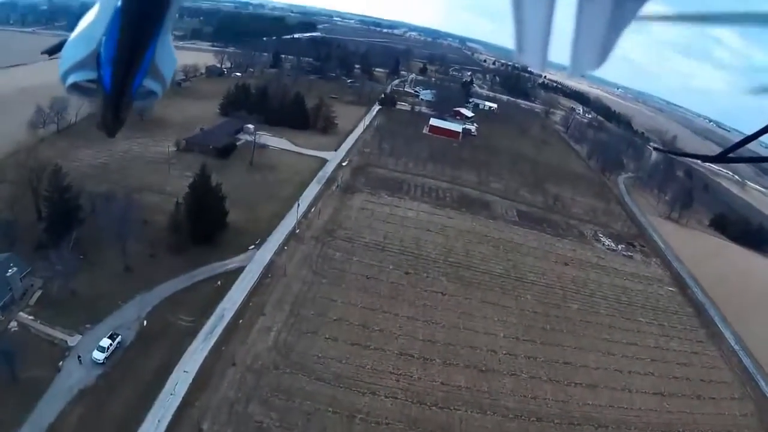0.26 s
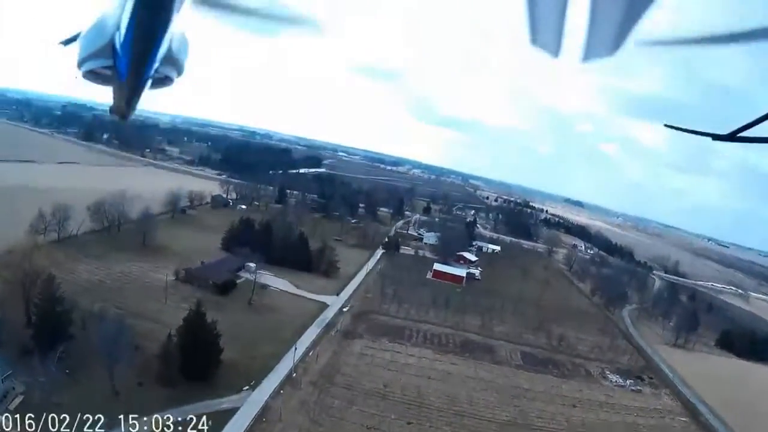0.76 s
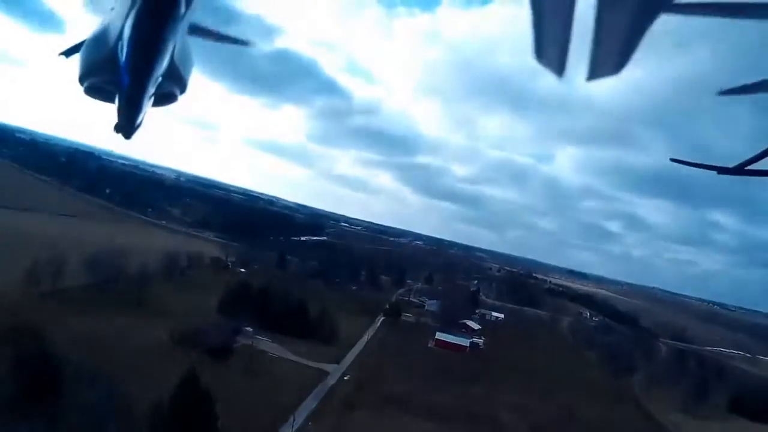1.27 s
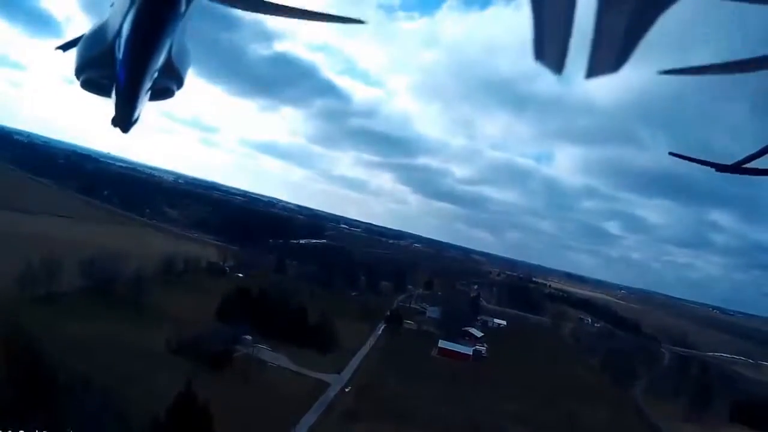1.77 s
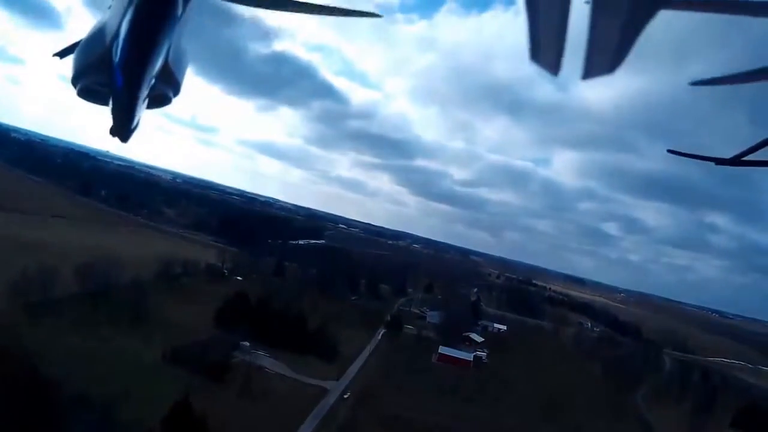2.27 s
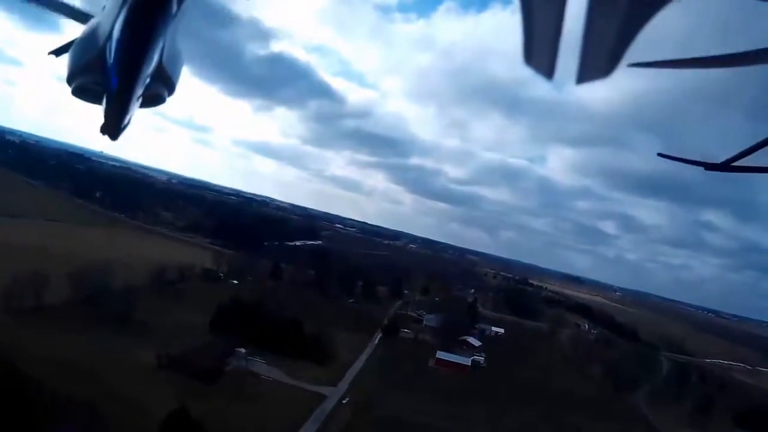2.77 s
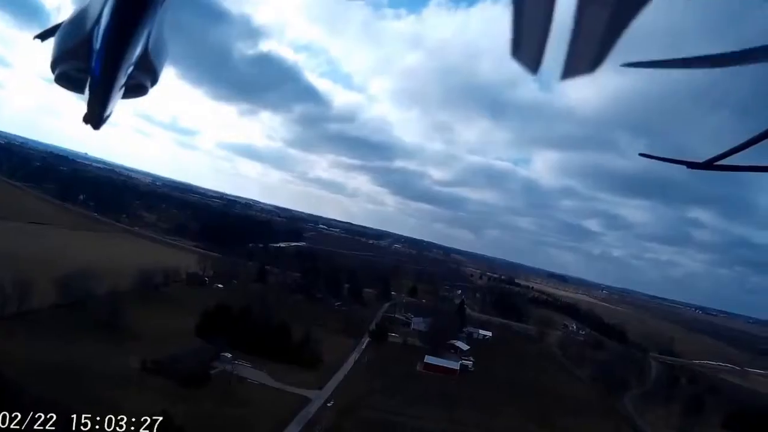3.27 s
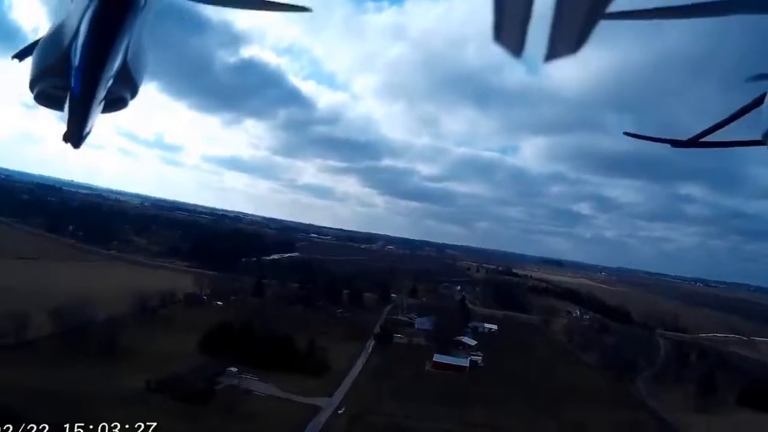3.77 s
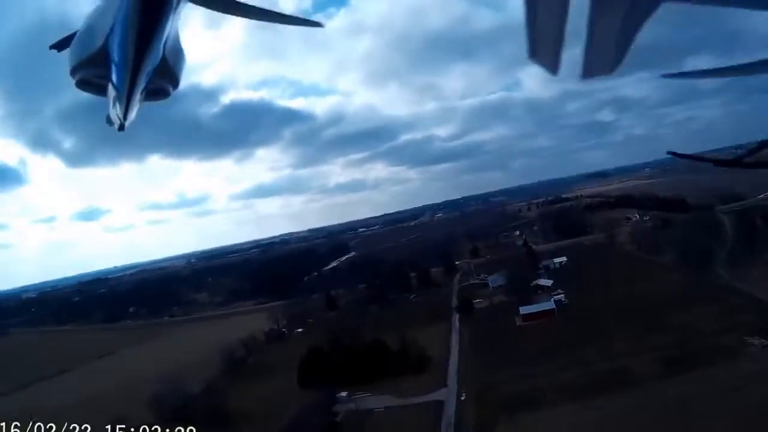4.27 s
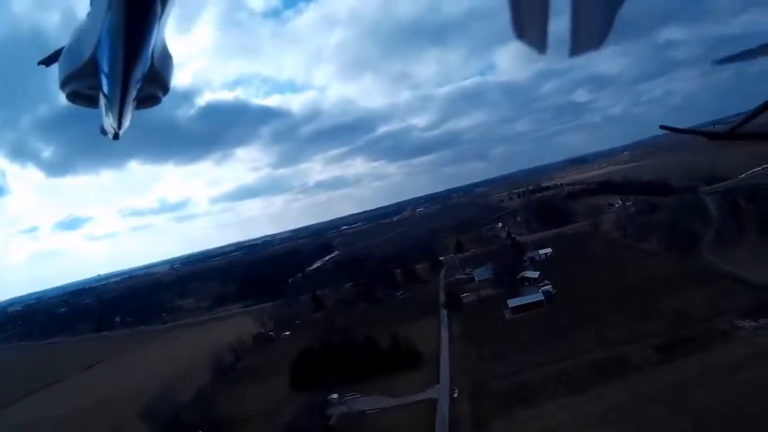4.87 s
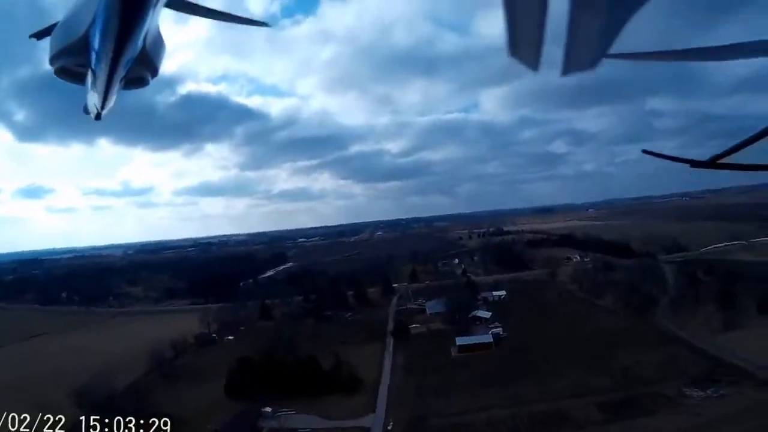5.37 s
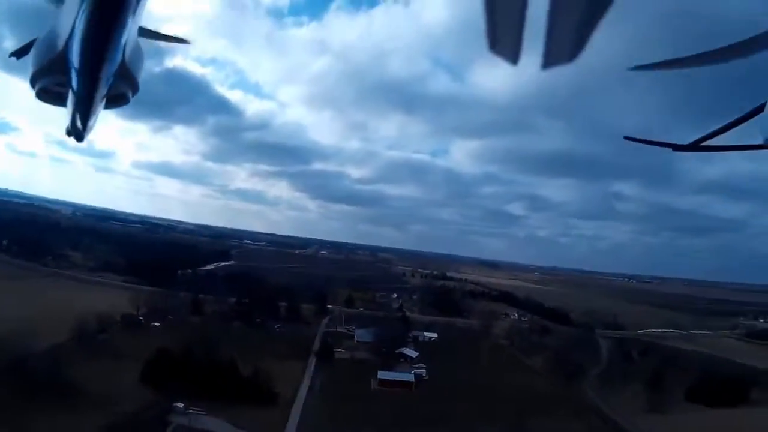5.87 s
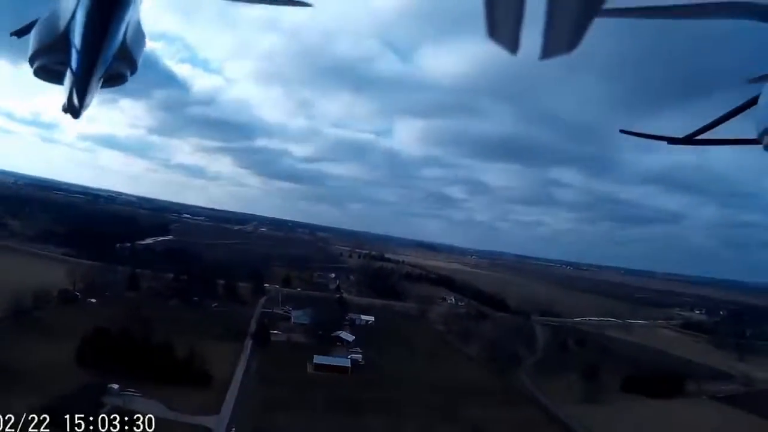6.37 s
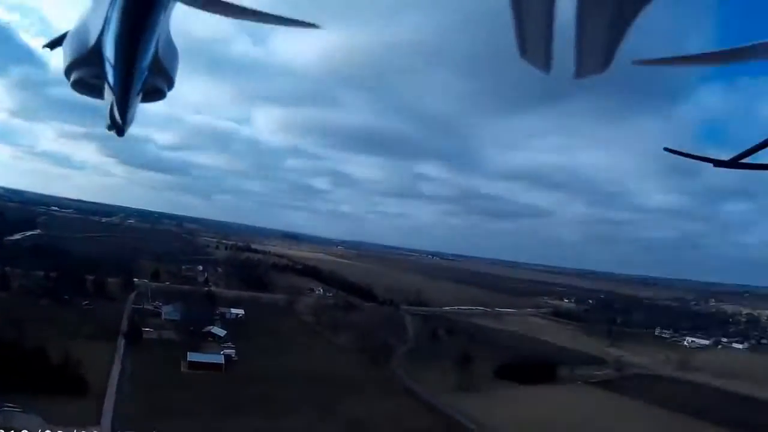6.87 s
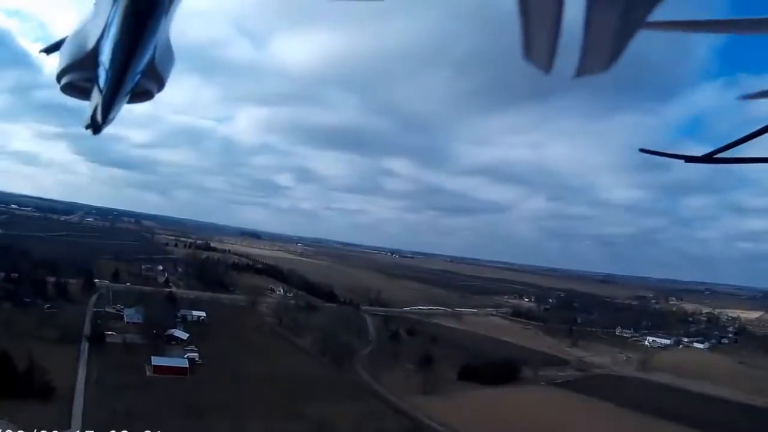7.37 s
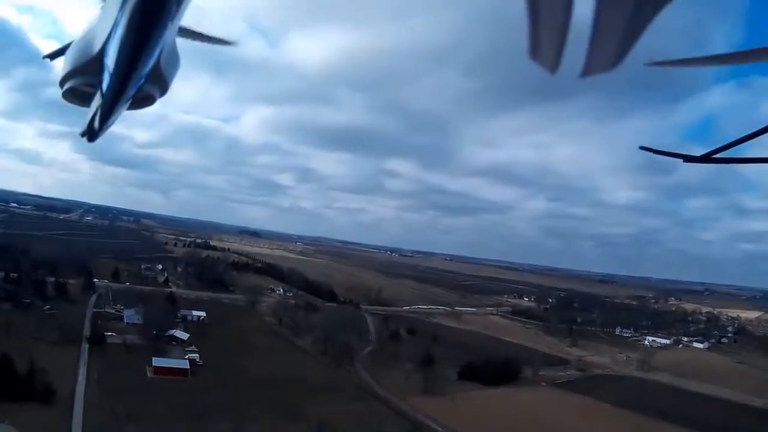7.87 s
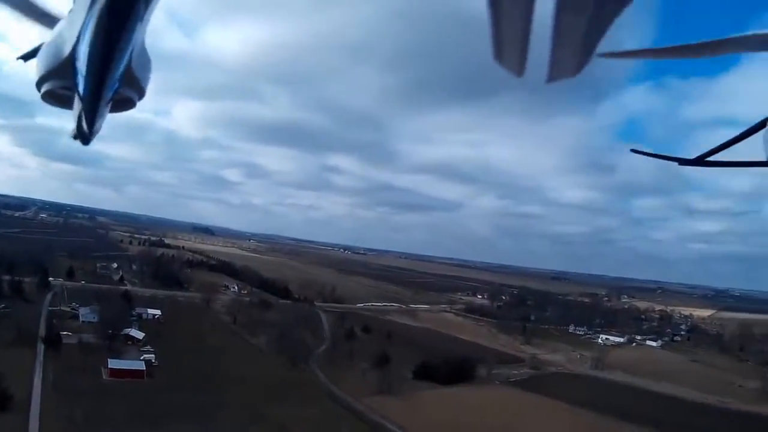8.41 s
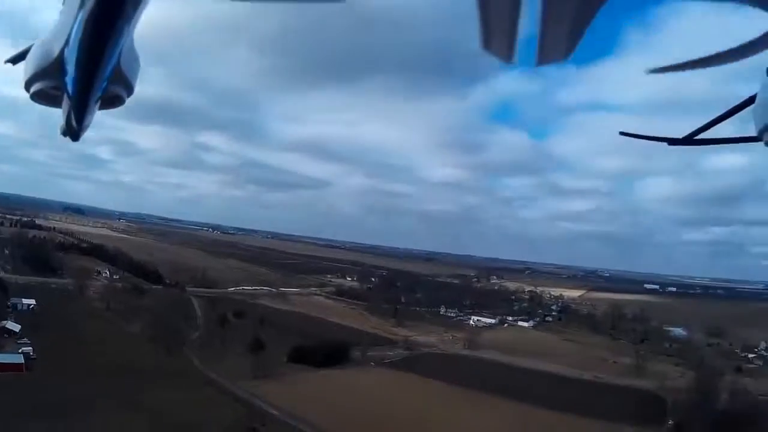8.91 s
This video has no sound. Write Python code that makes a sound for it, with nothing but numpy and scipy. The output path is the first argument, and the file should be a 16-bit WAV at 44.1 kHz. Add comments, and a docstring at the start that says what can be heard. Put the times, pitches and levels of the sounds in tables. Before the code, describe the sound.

Small drone motors whine and buzz in a wavering, beating cluster over propeller wash, with low wind buffeting that fades and pitch sagging late.

```python
"""A toy quadcopter flies over open fields, heard from a camera bolted under its frame. From the start four
geared brushed motors whine as beating harmonic series, each turning a two-bladed propeller. Filtered noise
gives the hiss of propeller wash, random clicks the gear rattle, a steady sine the drive whistle. Low noise
gives the wind buffet: strong at first, faint at the end. Midway the hiss weakens and motor C peaks; after 7 s
the level dips briefly; all but motor C end well below their starting speeds."""
import sys
import numpy as np
from scipy import signal
from scipy.fft import rfft, irfft, next_fast_len
from scipy.io import wavfile

SR = 44100
rng = np.random.default_rng(int(sys.argv[2]) if len(sys.argv) > 2 else 0)


def persist_wave(psi):
    """Save psi, clipped to +-1, as 16-bit WAV."""
    counts = np.round(np.clip(psi, -1, 1) * 32767).astype(np.int16)
    wavfile.write(sys.argv[1], SR, np.atleast_2d(counts).T)


N = 403206
TIME = np.arange(N) / SR
GEAR_RATIO, PINION_TEETH = 11, 9   # shaft turns per propeller turn; teeth meshing per shaft turn


def from_db(db):
    """Level: amplitude gain is ten to the power of dB / 20."""
    return 10 ** (np.asarray(db) / 20)


def rms_one(x):
    """Normalisation: scale a signal to unit mean power."""
    return x / np.sqrt(np.mean(x ** 2) + 1e-20)


def in_time(points):
    """Linear interpolation: read a curve of (t/s, value) at every sample."""
    t, value = np.transpose(points)
    return np.interp(TIME, t, value)


def at_hz(points, hz):
    """Spectral envelope: read (f/Hz, level/dB) on a log-frequency axis."""
    known_hz, db = np.transpose(points)
    return np.interp(np.log(hz + 1e-9), np.log(known_hz), db)


def resonance_db(hz, centre_hz, width_hz, lift_db):
    """Resonance: a bell-shaped lift in dB, halved at half the width from its centre."""
    return lift_db / (1 + (2 * (hz - centre_hz) / width_hz) ** 2)


def coloured(x, response_db):
    """Linear filtering: multiply the spectrum by a zero-phase response given in dB."""
    size = next_fast_len(N + SR // 10)
    hz = np.arange(size // 2 + 1) * SR / size
    return irfft(rfft(x, size) * from_db(response_db(hz)), size)[:N]


def drift(rate_hz):
    """Low-pass random process: two equal poles at the given rate, spread one."""
    step = 40   # samples between computed points
    pole = np.exp(-2 * np.pi * rate_hz * step / SR)
    noise = rng.standard_normal(N // step + 2002)
    slow = signal.lfilter([1], [1, -2 * pole, pole * pole], noise)[2000:]   # drop the settling
    return np.interp(np.arange(N) / step, np.arange(len(slow)), rms_one(slow))


def throttle(speed):
    """Speed deviation: hundreds of turns per s above the motor's own mean."""
    return (speed - speed.mean()) / 100


# shaft speeds of the four motors: (t/s, speed/turns per s)
SPEED_A = [(0.0, 763), (0.54, 752), (0.94, 798), (1.86, 750), (2.08, 769), (2.26, 732), (3.28, 738),
           (3.54, 713), (4.02, 755), (4.24, 726), (5.2, 742), (5.32, 726), (5.74, 729), (5.82, 749),
           (6.2, 752), (6.44, 725), (6.52, 739), (6.8, 689), (7.22, 667), (7.6, 720), (8.9, 624),
           (9.14, 635)]
SPEED_B = [(0.0, 694), (0.16, 733), (0.82, 741), (3.06, 681), (3.56, 684), (3.96, 650), (4.28, 671),
           (4.64, 644), (4.86, 667), (5.32, 649), (5.4, 633), (5.64, 636), (5.9, 607), (6.44, 628),
           (6.56, 569), (6.66, 562), (7.0, 606), (7.12, 680), (7.4, 615), (8.1, 602), (8.24, 550),
           (9.14, 505)]
SPEED_C = [(0.0, 584), (0.52, 617), (1.0, 617), (1.9, 674), (2.18, 653), (3.22, 714), (3.7, 723),
           (4.22, 774), (4.68, 740), (4.82, 692), (5.62, 617), (6.44, 647), (6.56, 674), (6.96, 620),
           (7.68, 689), (8.38, 667), (8.62, 634), (9.14, 631)]
SPEED_D = [(0.0, 593), (0.48, 582), (0.92, 520), (2.06, 530), (2.26, 568), (3.26, 540), (3.94, 546),
           (4.26, 498), (4.76, 579), (6.1, 616), (6.44, 575), (6.58, 501), (7.0, 539), (7.04, 606),
           (7.16, 616), (7.34, 552), (8.1, 566), (8.24, 507), (9.14, 472)]


def motor_speeds():
    """Independent rotation: unequal shaft speeds make the motors beat against each other."""
    return [in_time(points) for points in (SPEED_A, SPEED_B, SPEED_C, SPEED_D)]


def shaft_angle(speed, hunting=0.000693, jitter=0.00034):
    """Phase is the integral of speed, which the controller nudges and gear backlash jitters."""
    unsteady_speed = speed * (1 + hunting * drift(6.7) + jitter * drift(74))
    return 2 * np.pi * (np.cumsum(unsteady_speed) / SR + rng.random())


# level of the wash noise, shared by rotor buzz, hum and rattle; the level dips briefly after 7 s: (t/s,
# level/dB)
SHARED_LEVEL = [(0.0, -1.5), (0.28, 1.5), (2.11, 2), (2.67, 1), (2.81, -1.5), (3.23, -1), (3.8, -2),
                (4.08, -1.5), (4.36, -3.0), (5.62, -0.5), (6.33, 1.5), (6.47, 1.5), (7.03, 3.5), (7.17, -2),
                (7.73, 2), (9.14, 3.5)]


def shared_level():
    """Level curve: one swing in dB shared by wash, buzz, hum and rattle; the level dips briefly after 7 s."""
    return in_time(SHARED_LEVEL)


# gusts at the microphone, shared in part by hum and rattle: (t/s, level/dB)
GUSTS = [(0.0, 9.5), (1.41, 7.5), (2.53, 1.5), (2.81, 4), (3.94, -1.5), (4.36, -4), (4.5, -3.5),
         (5.77, -1.5), (5.91, 3.5), (6.33, -3.5), (7.17, -5), (7.45, -4), (9.14, -9.5)]


def gust_swing():
    """Large-scale turbulence: one slow swing of the wind level in dB."""
    return in_time(GUSTS)


# level of the second shaft harmonic: (t/s, level/dB)
OCTAVE_SWELL = [(0, -3.5), (1.6, -5), (2.3, 3.5), (4.6, 0.5), (5.9, 6.5), (7.15, -0.5), (7.7, 4),
                (9.14, -0.5)]
BUZZ_SHARE = 1            # share of the shared level curve
MESH_THROTTLE_DB = 1.5    # dB per 100 turns per s above the mean speed
WHINE_SLOWING_DB = 4      # other harmonics: dB per 100 turns per s below the mean speed


def motor(speed, angle, levels_db, arm, rotor, shared_db):
    """Harmonic synthesis with modulation: load swings per turn and per blade add sidebands."""
    once_a_turn, per_blade, flutter_db, mesh_slop = 0.17, 0.18, 1.5, 0.2
    propeller_turn = angle / GEAR_RATIO
    slowing = -throttle(speed)
    # imbalance shakes the arm most when the rotor turns at the arm's resonance
    *arm_resonance, away_db = arm
    shake_db = resonance_db(speed, *arm_resonance) + away_db
    # three-pole rotors buzz on the third harmonic, harder when throttled back
    buzz_base_db, buzz_slowing_db = rotor
    buzz_db = buzz_base_db + buzz_slowing_db * slowing + BUZZ_SHARE * shared_db
    mesh_db = MESH_THROTTLE_DB * throttle(speed) + flutter_db * drift(7.6)
    upper_db = WHINE_SLOWING_DB * slowing + flutter_db * drift(10)
    swell_db = {1: shake_db, 2: in_time(OCTAVE_SWELL), 3: buzz_db, PINION_TEETH: mesh_db}
    # play between the teeth smears the phase of the mesh tone (radians)
    slop = {PINION_TEETH: mesh_slop * (drift(60) + np.sin(propeller_turn))}
    whine = 0
    for row, db in zip(HARMONICS, levels_db):
        k = round(row[0])
        phase = k * angle + slop.get(k, 0) + 2 * np.pi * rng.random()
        whine = whine + from_db(db + swell_db.get(k, upper_db)) * np.sin(phase)
    turn_swing = once_a_turn * np.sin(propeller_turn)
    blade_swing = per_blade * np.sin(2 * propeller_turn + 2 * np.pi * rng.random())
    return whine * (1 + turn_swing + blade_swing)


# shaft harmonics before the frame, the ninth being the pinion mesh:
# (multiple of shaft speed, base level/dB of motor A, B, C, D)
HARMONICS = [(1, -26, -24.5, -32, -27.5), (2, -23.5, -28, -30.5, -39.5), (3, -18.5, -18.5, -23.5, -25),
             (4, -28, -24.5, -34, -31.5), (5, -28, -28.5, -35, -34), (6, -21.5, -30, -25, -40),
             (7, -36, -32.5, -35, -34), (8, -25.5, -31, -28, -34), (9, -18.5, -29, -21.5, -18)]
# resonance of each arm, rows A-D: (f/Hz, width/Hz, lift/dB, level away from it/dB)
ARMS = [(659.6, 31, 5.5, -1), (659, 149, 12, -7), (665, 38, 7, -1.5), (616, 32, 8.5, -4)]
# buzz of each three-pole rotor, rows A-D: (level/dB, slope/dB per 100 turns per s below mean speed)
ROTORS = [(-2, 1), (-2, 6), (-0.5, 2.5), (-1, 5)]
# transmission through arms and frame: (f/Hz, level/dB)
FRAME = [(450, -5.5), (520, -12), (580, -2.5), (680, 2), (790, -3), (1300, -10), (1550, -16), (1900, -17),
         (2250, -15), (2670, -23), (2900, -35), (3800, -27.5), (4420, -29.5), (4750, -41), (5080, -36),
         (5550, -38.5), (5850, -39.5), (6150, -40.5), (6600, -49.5), (7050, -35.5), (7800, -29)]


def motors(speeds, angles, shared_db):
    """Structure-borne transmission: the summed vibration is shaped by the frame's response."""
    levels = np.transpose(HARMONICS)[1:]
    vibration = sum(motor(*parts, shared_db) for parts in zip(speeds, angles, levels, ARMS, ROTORS))
    return np.sqrt(2) * coloured(vibration, lambda hz: at_hz(FRAME, hz))


# propeller tones, the second at the blade rate: (multiple of propeller speed, relative level/dB)
BLADE_TONES = [(1, -25.5), (2, 2.5), (3, -12), (4, -11), (5, -30.5)]


def propeller(angle, gust_db=-0.63):
    """Blade-passing tones: harmonics of rotation, made unsteady by rough air."""
    tones = 0
    for multiple, db in BLADE_TONES:
        phase = round(multiple) * angle / GEAR_RATIO + 2 * np.pi * rng.random()
        tones = tones + from_db(db) * np.sin(phase)
    return np.sqrt(2) * tones * from_db(gust_db * drift(8.8))


# hum of each propeller, rows A-D: (base level/dB, share of the gusts' swing,
# share of the shared level curve, slope/dB per 100 turns per s above mean speed)
PROPELLER_HUM = [(-28, -0, 0.8, 5.5), (-35, 0.47, 0.29, 3), (-36.5, -0.3, .3, -2.5), (-37, 0.6, 0.36, -7.5)]


def propellers(speeds, angles, shared_db, gust_db):
    """Superposition: four hums, each weighted by gusts, the shared level and its own speed."""
    hum = 0
    for speed, angle, row in zip(speeds, angles, PROPELLER_HUM):
        db, by_gusts, by_shared, by_speed = row
        level_db = db + by_gusts * gust_db + by_shared * shared_db + by_speed * throttle(speed)
        hum = hum + from_db(level_db) * propeller(angle)
    return hum


# resonances of the plastic shell: (f/Hz, width/Hz, lift/dB)
SHELL = [(710, 360, 3), (2260, 210, 7.5), (3790, 400, 6), (7290, 910, 9), (10670, 600, 4)]


def shell_db(hz):
    """Modal response: the lifts of the shell's resonances add in dB."""
    return sum(resonance_db(hz, *row) for row in SHELL)


# spectrum of the wash before the shell's lift: (f/Hz, relative level/dB per Hz)
WASH = [(40, -17), (250, -2.5), (430, -4), (800, 1), (1350, -2.5), (1800, -9), (2500, -15), (3100, -23.5),
        (4800, -22.5), (6400, -37), (9600, -41), (12000, -38.5), (13200, -55.5), (15500, -50)]
# gain of the treble hiss: (t/s, level/dB)
HISS = [(0, 0), (1.4, -3), (2.6, 1), (9.14, 0)]
WASH_DB = -25   # base level, before the shared level curve


def wash(angle, shared_db, chop=0.14, wobble=0.07, swirl_db=0.5, treble_hz=8000):
    """Turbulence noise: air rushing over the shell, chopped by the nearest propeller."""
    turn = angle / GEAR_RATIO
    chopping = 1 + chop * np.sin(2 * turn) + wobble * np.sin(turn)
    air = rng.standard_normal(N) * chopping * from_db(swirl_db * drift(12))
    air = rms_one(coloured(air, lambda hz: at_hz(WASH, hz) + shell_db(hz)))
    treble = coloured(air, lambda hz: -10 * np.log10(1 + (treble_hz / (hz + 1)) ** 10))
    rush = air + (from_db(in_time(HISS)) - 1) * treble   # only the treble follows the hiss curve
    return from_db(WASH_DB + shared_db) * rush


# gear rattle: base level/dB, and shares of the shared level curve and of the gusts' swing
RATTLE_DB, RATTLE_SHARE, RATTLE_FOLLOWS_GUSTS = -47.5, 0.97, 0.22


def gear_ticks(shared_db, gust_db, per_s=300, spread_db=5.5, ring_hz=4150, width_hz=1100):
    """Impact excitation: loose teeth knock at random and ring the shell."""
    knocks = rng.random(N) < per_s / SR
    clicks = knocks * from_db(spread_db * np.clip(rng.standard_normal(N), -2, 2))
    edges_hz = [ring_hz - width_hz / 2, ring_hz + width_hz / 2]
    band = signal.butter(4, edges_hz, "band", fs=SR, output="sos")
    ticks = rms_one(signal.sosfilt(band, clicks + 1e-18))
    level_db = RATTLE_DB + RATTLE_SHARE * shared_db + RATTLE_FOLLOWS_GUSTS * gust_db
    return from_db(level_db) * ticks


# spectrum of the wind at the microphone port: (f/Hz, relative level/dB per Hz)
BUFFET = [(12, -10), (30, 1.5), (55, 7.5), (110, -1), (220, -1), (450, -25), (1500, -62)]
BUFFET_DB = -31.5   # base level, before gusts and lumps


def buffet(gust_db, lumps_db=1.5):
    """Wind-induced pressure noise: low, lumpy turbulence at the microphone port."""
    wind = rms_one(coloured(rng.standard_normal(N), lambda hz: at_hz(BUFFET, hz)))
    return from_db(BUFFET_DB + gust_db) * wind * from_db(lumps_db * drift(6.3))


def drive_whistle(switching_hz=3670, rms_db=-50):
    """Periodic excitation: motor current switched at one fixed rate sounds a pure tone."""
    return np.sqrt(2) * from_db(rms_db) * np.sin(2 * np.pi * switching_hz * TIME)


def scene():
    """Superposition: motors arrive through the frame, propellers and wind through the air."""
    speeds = motor_speeds()
    angles = [shaft_angle(speed) for speed in speeds]
    shared_db, gust_db = shared_level(), gust_swing()
    whine = motors(speeds, angles, shared_db)
    hum = propellers(speeds, angles, shared_db, gust_db)
    rush = wash(angles[0], shared_db)
    ticks = gear_ticks(shared_db, gust_db)
    wind = buffet(gust_db)
    return (whine + hum + rush + ticks + wind + drive_whistle())[None]


def record(dry, stop_hz=15900, fade_s=0.004):
    """Band limitation: the camera cuts off the top treble; short linear fades bound the sound."""
    fade = np.clip(np.minimum(TIME, TIME[::-1]) / fade_s, 0, 1)
    low_pass = signal.cheby2(24, 70, stop_hz, fs=SR, output="sos")   # 70 dB down from stop_hz up
    return signal.sosfilt(low_pass, dry * fade)


dry = scene()
out = record(dry)
persist_wave(out)
```